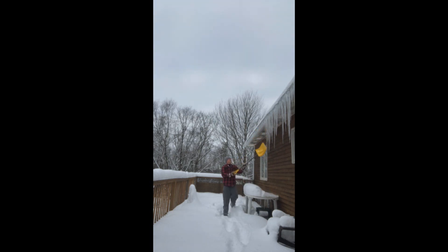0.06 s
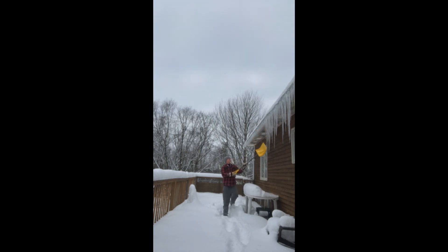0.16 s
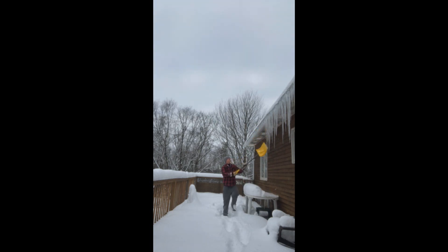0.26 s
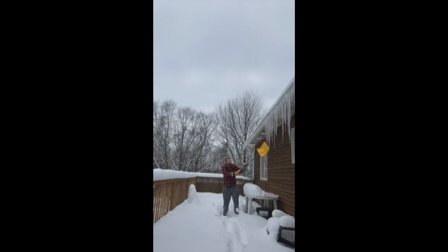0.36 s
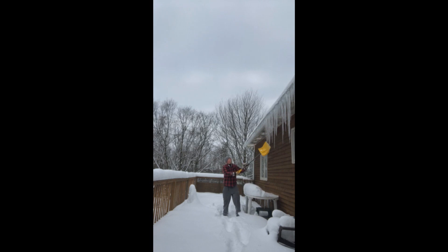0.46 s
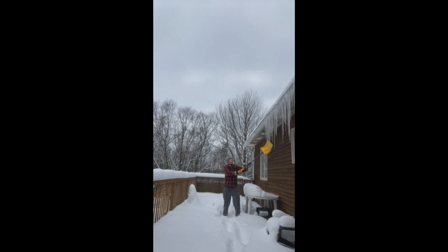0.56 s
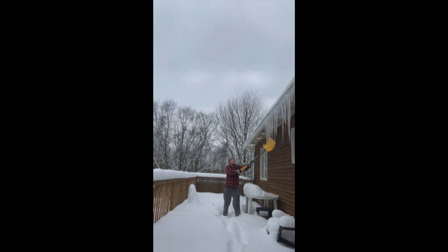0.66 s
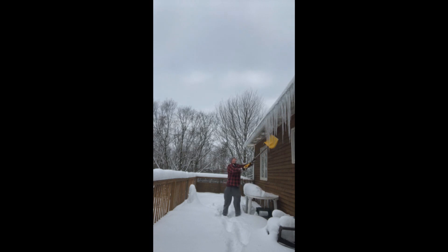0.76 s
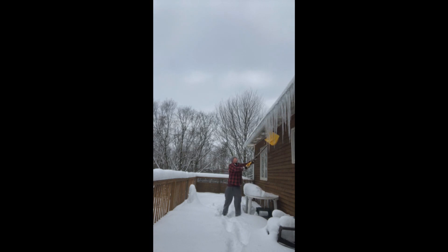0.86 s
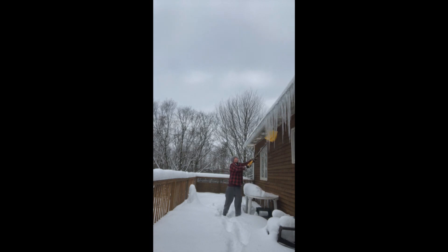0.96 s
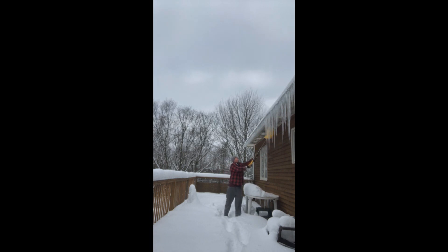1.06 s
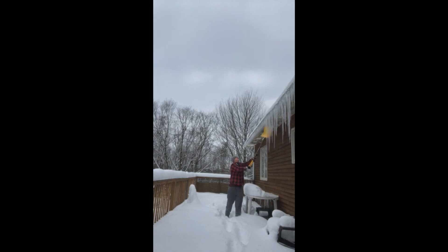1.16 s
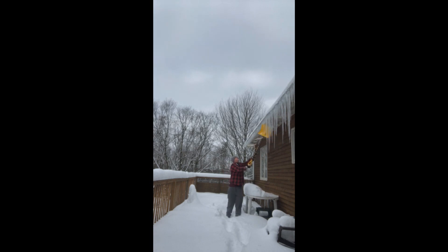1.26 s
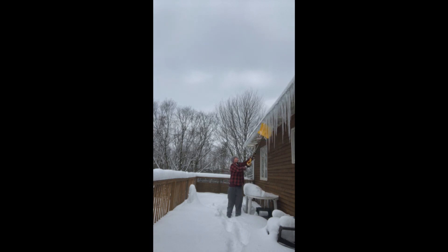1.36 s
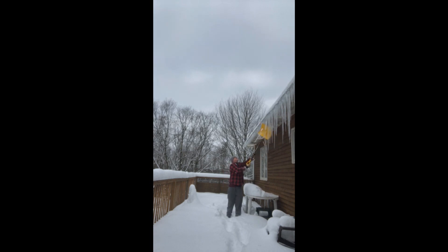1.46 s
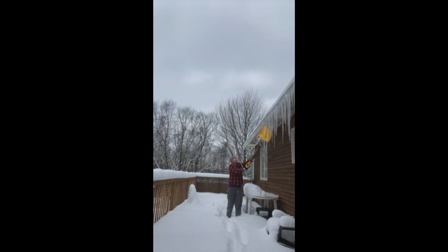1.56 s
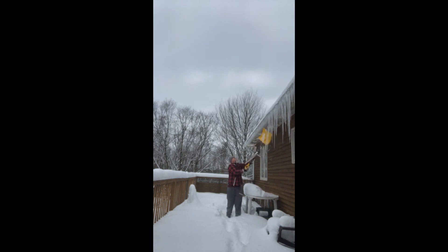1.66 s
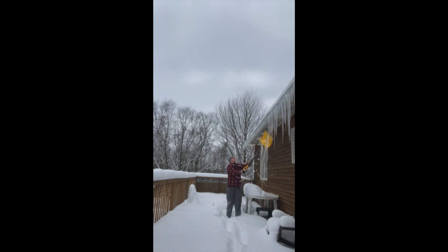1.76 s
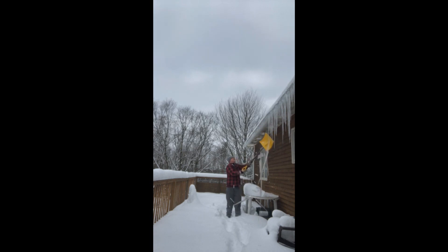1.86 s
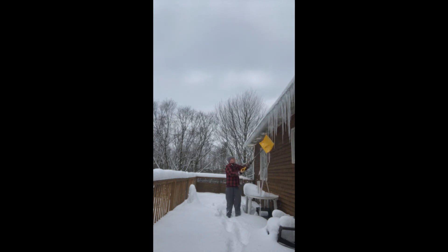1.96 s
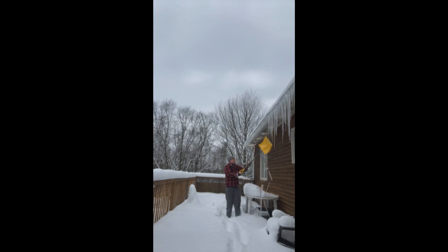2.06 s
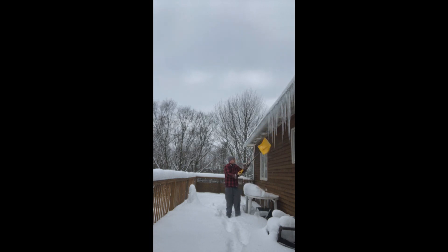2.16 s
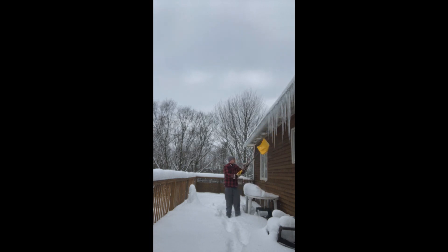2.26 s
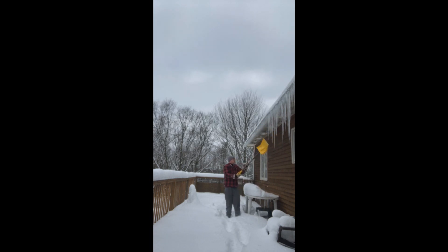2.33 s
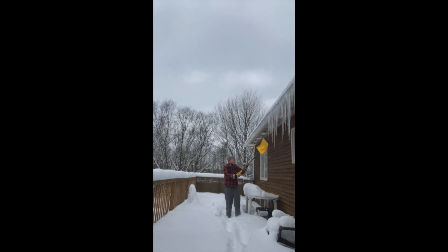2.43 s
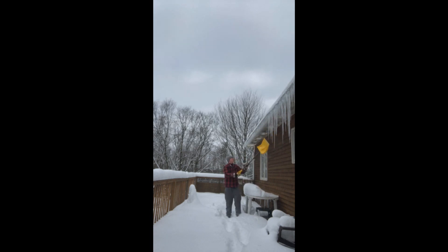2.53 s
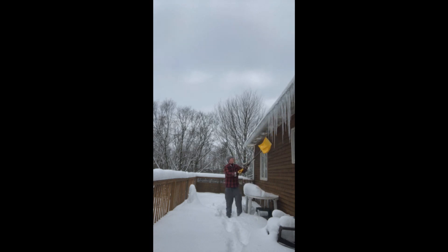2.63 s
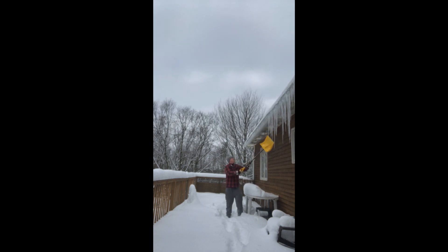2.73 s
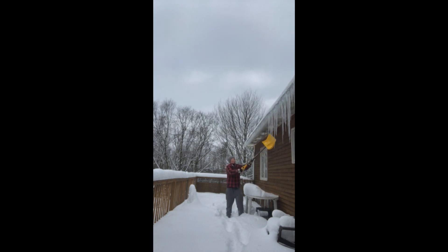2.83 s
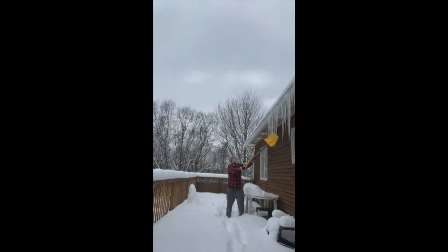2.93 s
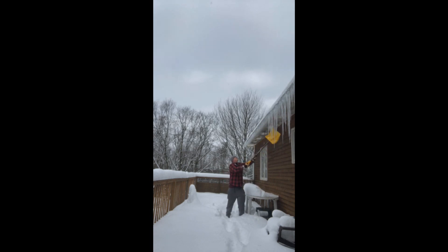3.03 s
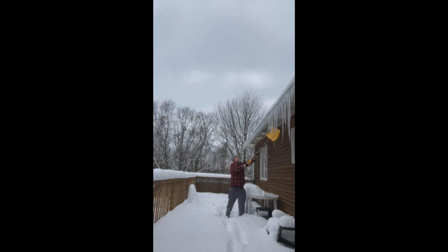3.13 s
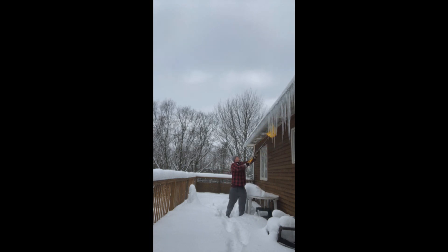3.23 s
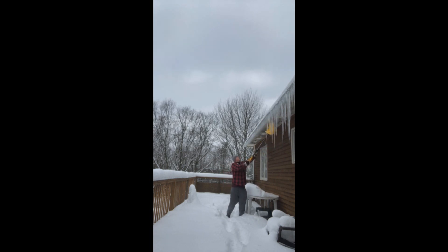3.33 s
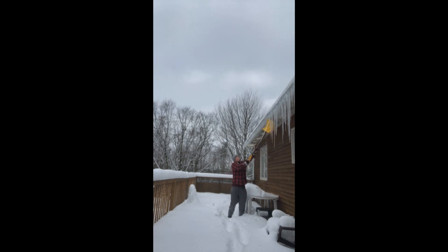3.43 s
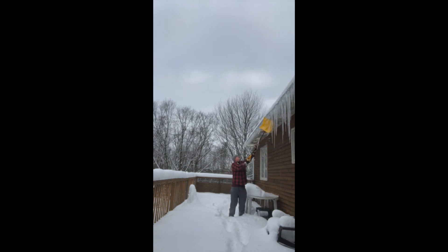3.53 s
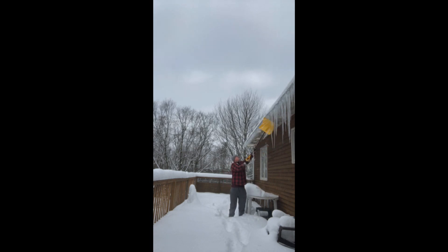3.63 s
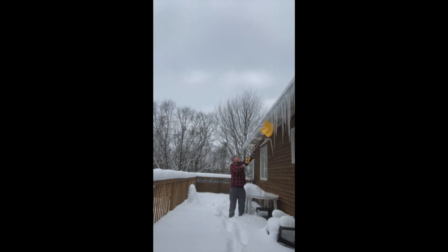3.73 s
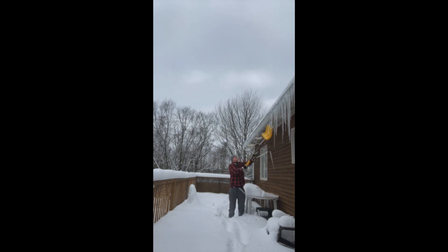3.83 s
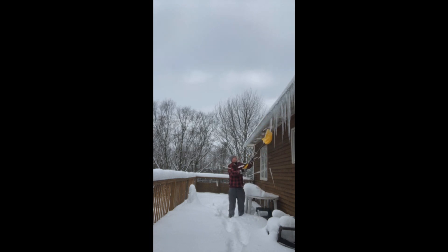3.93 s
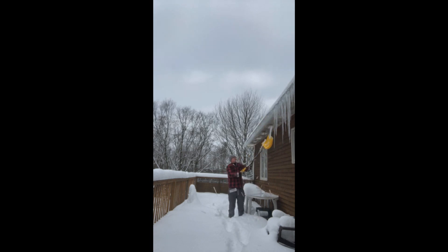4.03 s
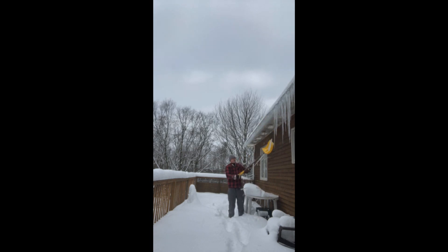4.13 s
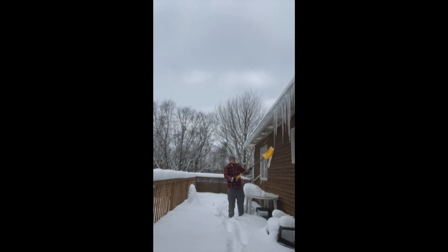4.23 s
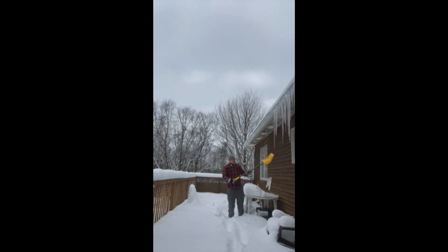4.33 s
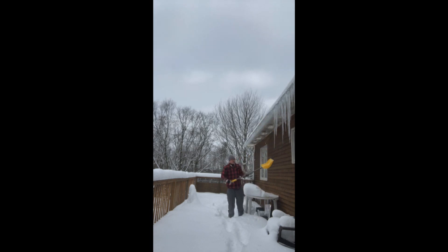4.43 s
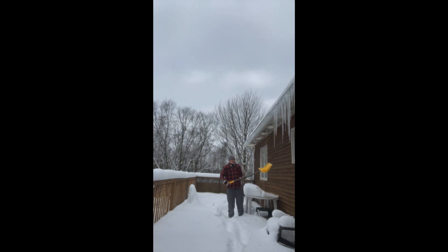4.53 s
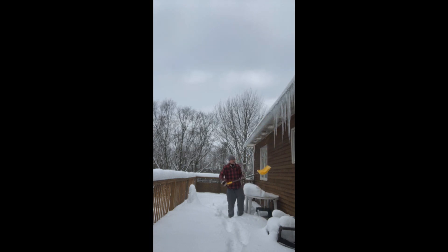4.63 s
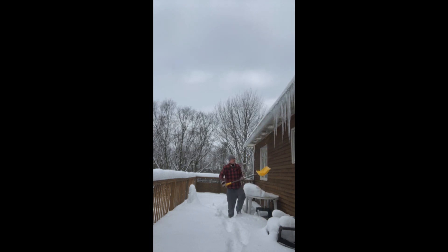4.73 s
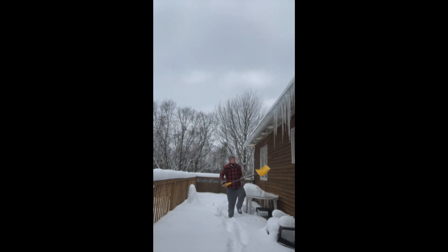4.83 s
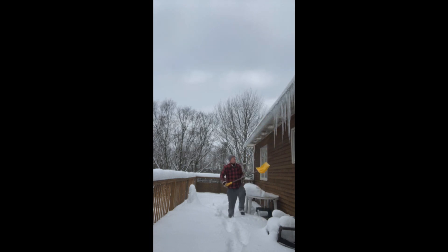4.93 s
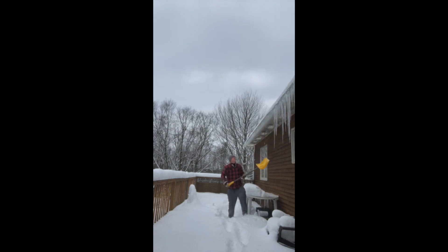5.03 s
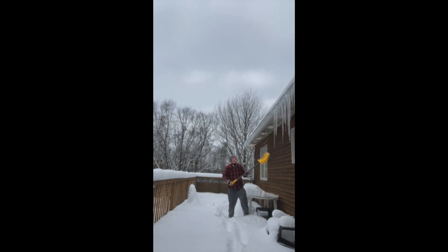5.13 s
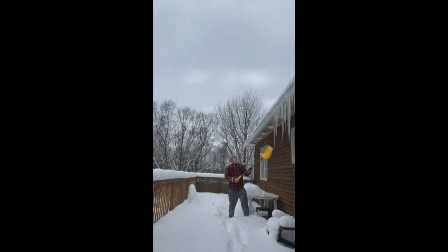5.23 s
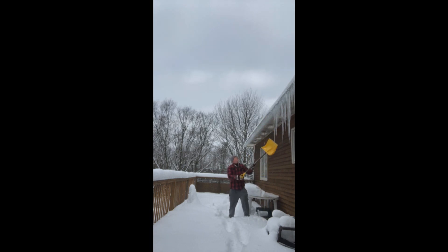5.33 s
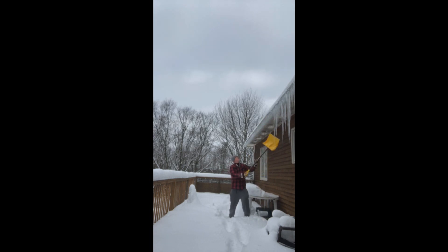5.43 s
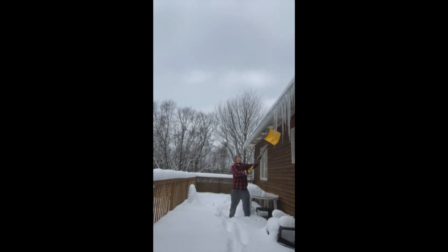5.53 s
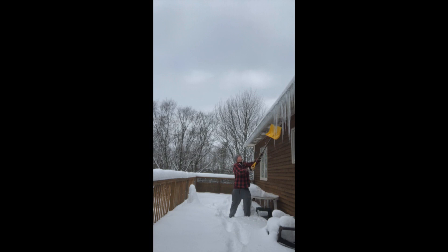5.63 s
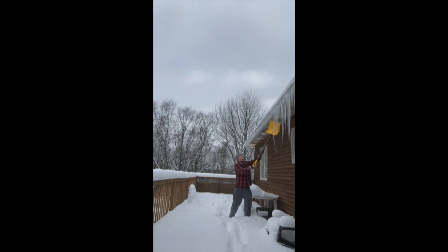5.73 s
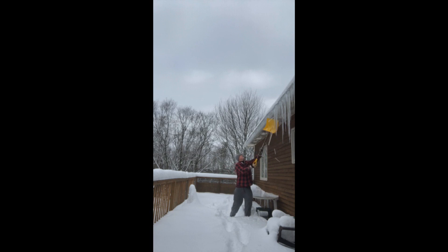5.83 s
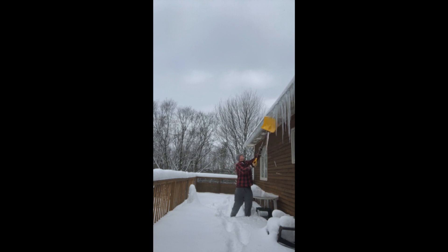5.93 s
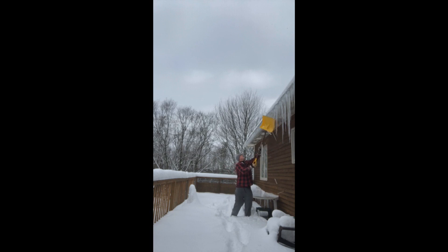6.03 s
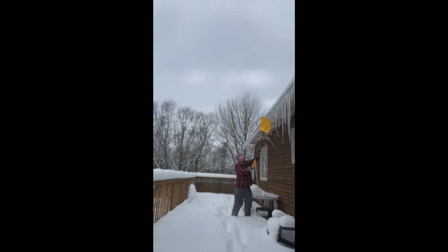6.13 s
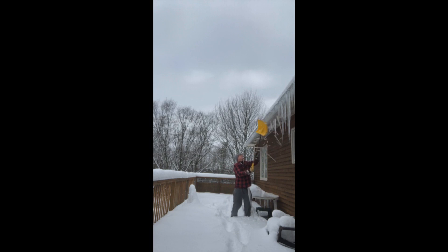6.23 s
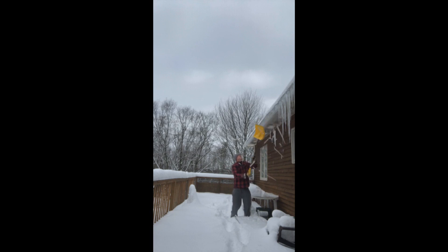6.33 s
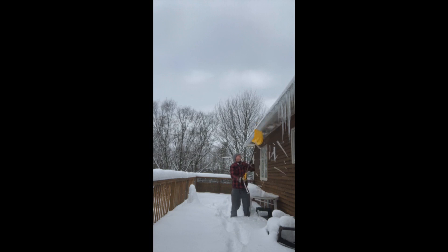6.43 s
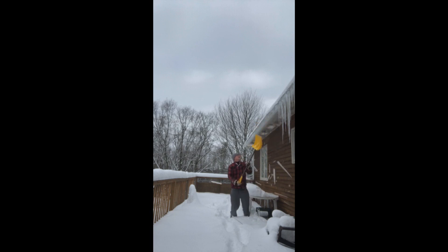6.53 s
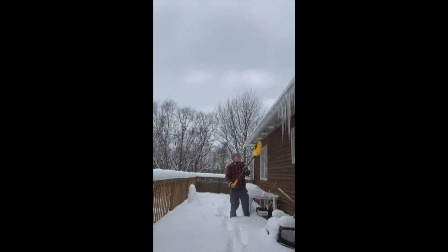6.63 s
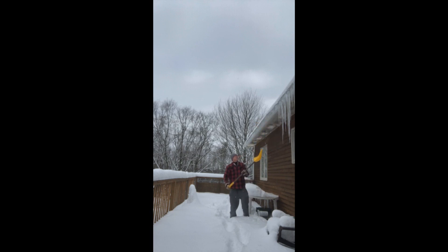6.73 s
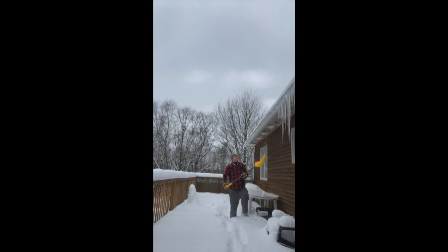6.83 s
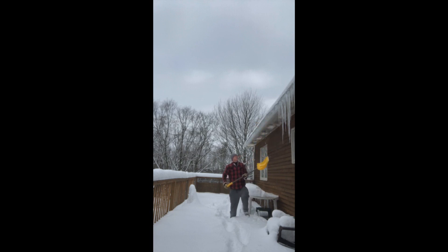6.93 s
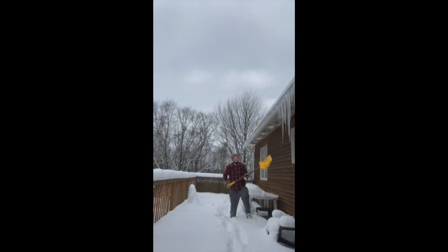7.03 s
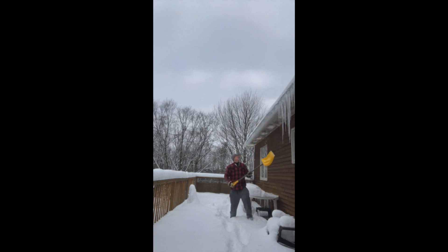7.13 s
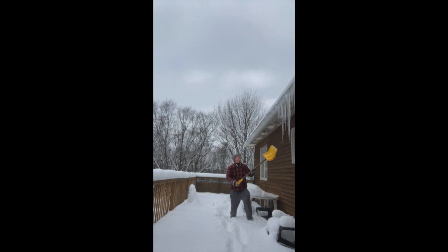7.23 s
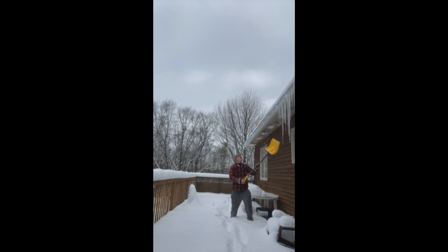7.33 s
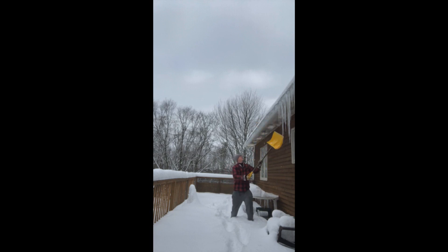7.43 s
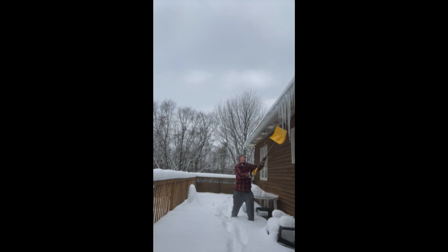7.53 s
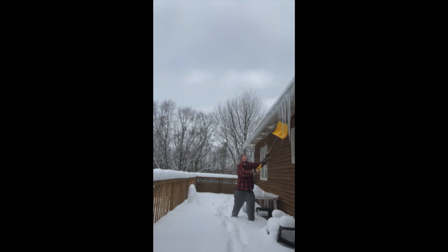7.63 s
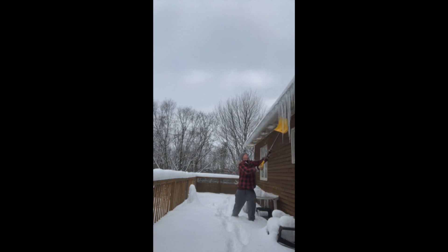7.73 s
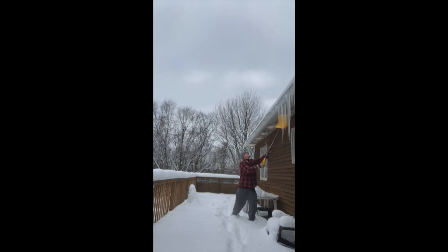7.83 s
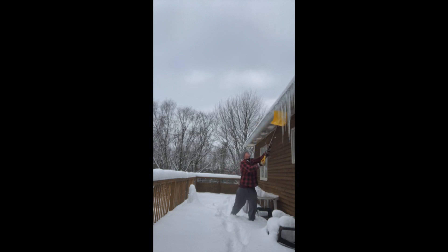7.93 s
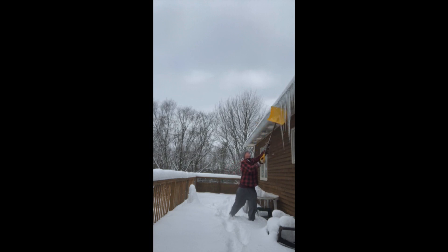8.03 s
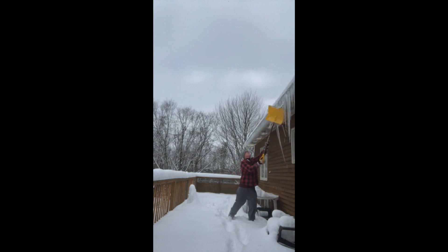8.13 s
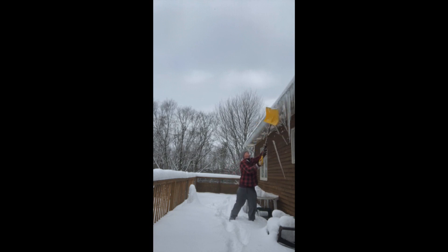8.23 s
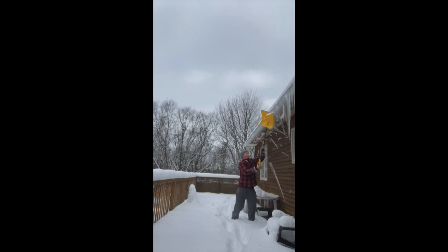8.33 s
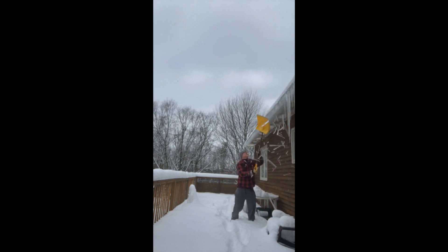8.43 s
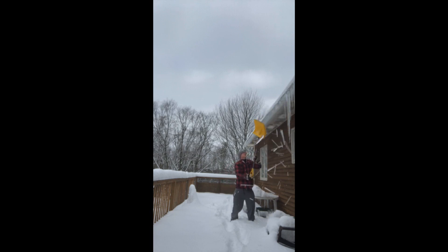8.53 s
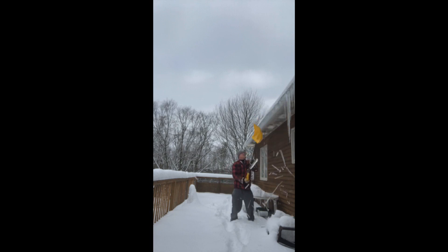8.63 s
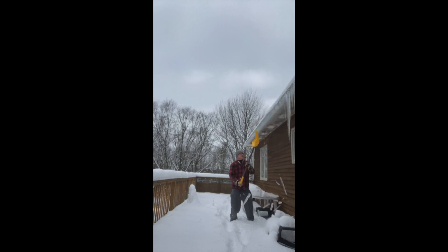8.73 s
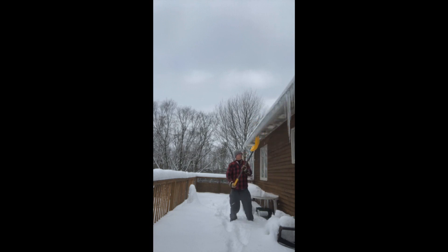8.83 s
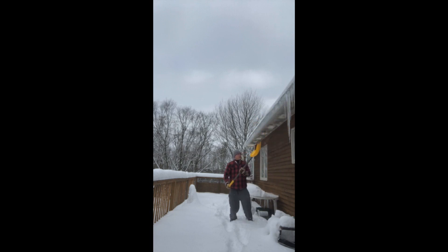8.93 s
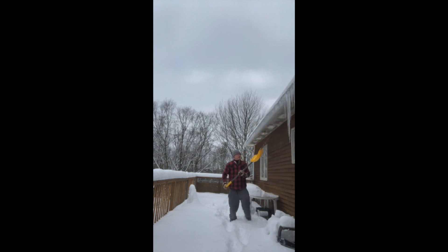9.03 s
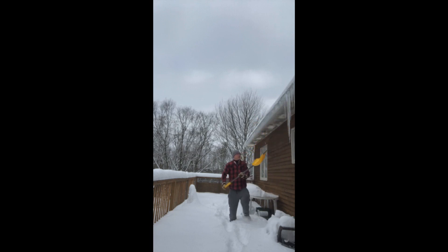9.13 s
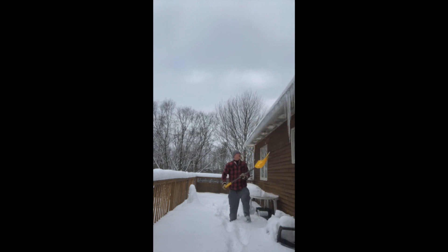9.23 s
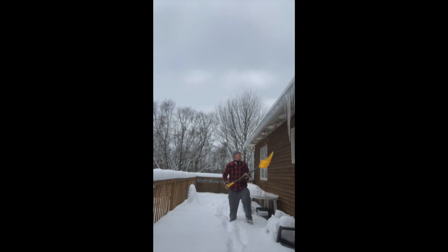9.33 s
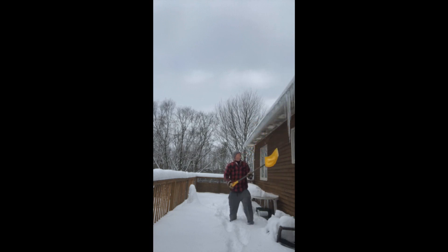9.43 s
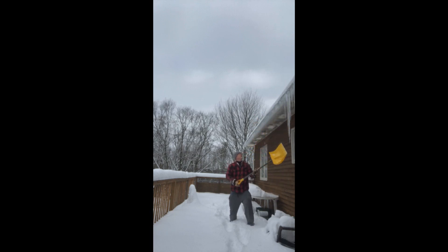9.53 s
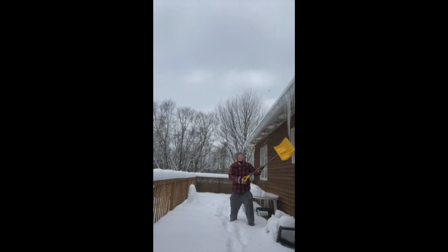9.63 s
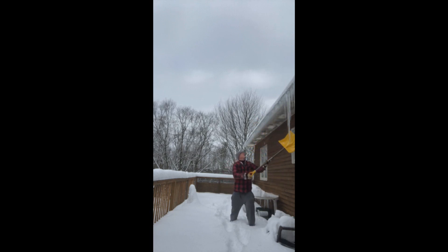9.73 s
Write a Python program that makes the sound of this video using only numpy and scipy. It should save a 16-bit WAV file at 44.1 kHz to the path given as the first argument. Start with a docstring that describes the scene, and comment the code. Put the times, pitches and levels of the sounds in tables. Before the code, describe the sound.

Icicles snap and shatter in repeated bursts as a rattling plastic shovel hits them, the pieces clacking and thudding down outdoors.

```python
"""A plastic shovel drags along a snowy roof edge and breaks off rows of icicles.
The blade knocks and rattles, and the gutter rings as it scrapes past. The ice cracks, thin shards ring,
thick pieces clack on the deck and heavy ones thud into the snow. Light wind, a far hum and a faint
whistle lie underneath; the house wall, deck and railing throw a little sound back."""
import sys
import numpy as np
from scipy import signal
from scipy.io import wavfile
from scipy.ndimage import uniform_filter1d

SR = 44100
rng = np.random.default_rng(int(sys.argv[2]) if len(sys.argv) > 2 else 0)


def generate_wav(sig):
    """Save sig (samples, or channels by samples) to the path in sys.argv[1] as 16-bit PCM at SR."""
    pcm = np.round(np.clip(np.atleast_2d(sig).T, -1, 1) * 32767).astype(np.int16)
    wavfile.write(sys.argv[1], SR, pcm)


N = 430857


def from_db(db):
    """Turn decibels into a number to multiply by."""
    return 10 ** (np.asarray(db) / 20)


def fade(clicks, fade_s):
    """Make every click die away by 60 dB in fade_s seconds."""
    return signal.lfilter([1], [1, -from_db(-60 / (fade_s * SR))], clicks + 1e-12)


def resonate(x, modes, strengths=None):
    """Ring an object's modes (its natural pitches); without strengths, white noise keeps its level."""
    out, power = 0, 0
    for k, (hz, width, level_db) in enumerate(modes):
        r = np.exp(-np.pi * width / SR)
        b = (1 - r * r) / 2 * np.array([1, 0, -1])
        a = [1, -2 * r * np.cos(2 * np.pi * hz / SR), r * r]
        drive = x if strengths is None else x * strengths[k]
        out += (-1) ** k * from_db(level_db) * signal.lfilter(b, a, drive + 1e-18)
        power += from_db(level_db) ** 2 * (1 - r * r) / 2
    return out / np.sqrt(power)


def shaped_noise(loudness, spectrum):
    """Noise that follows a loudness curve; the spectrum sets the balance of low and high."""
    hz, level_db = np.transpose(spectrum)
    edges = hz[0] * 2 ** np.arange(0, np.log2(hz[-1] / hz[0]) + .5, .5)  # half-octave bands
    edges = np.minimum(edges, .45 * SR)
    noise = loudness * rng.standard_normal((2, N))
    out, power = 0, 0
    for k, (low, high) in enumerate(zip(edges, edges[1:])):
        gain = from_db(np.interp(np.log(low * high) / 2, np.log(hz), level_db))
        band = signal.butter(2, [low, high], "band", fs=SR, output="sos")
        out += gain * signal.sosfilt(band, noise[k % 2])
        power += gain ** 2 * (high - low) * 2 / SR
    return out / np.sqrt(power)


def flutter(per_s, spread_db, fade_s):
    """Loudness curve of random bumps of uneven size, with an average power of 1."""
    sizes = from_db(spread_db * np.minimum(rng.exponential(1, N), 4))
    bumps = fade(sizes * (rng.random(N) < per_s / SR), fade_s)
    return bumps / np.sqrt(np.mean(bumps ** 2) + 1e-20)


def hits(rows, fade_s, rise_s, tail_s, tail_db):
    """Loudness curve of single hits: a short rise, a quick fade and a weaker, slow tail."""
    start_s, level_db = np.transpose(rows)[:2]
    clicks, tail = np.zeros(N), from_db(tail_db)
    clicks[(start_s * SR).astype(int)] = from_db(level_db)
    return fade(clicks, fade_s) + tail * fade(clicks, tail_s) - (1 + tail) * fade(clicks, rise_s)


def stretches(start_s, length_s, level_db, swell_db, fade_s, tail_s, tail_db, rise_s=0.0013):
    """Loudness curve of longer sounds: each rises, swells or sinks while held, then fades."""
    power = np.zeros(N)
    for start, held, db, swell in np.broadcast(start_s, length_s, level_db, swell_db):
        span = np.arange(int(start * SR), min(N, int((start + held + tail_s) * SR)))
        t = span / SR - start
        hold = from_db(db + swell * np.minimum(t / held, 1)) * (1 - np.exp(-t / rise_s))
        after = np.maximum(t - held, 0)
        release = from_db(-60 * after / fade_s) + from_db(tail_db - 60 * after / tail_s)
        power[span] += (hold * release / (1 + from_db(tail_db))) ** 2
    return np.sqrt(power)


def shovel(blade):
    """Knocks and rattling shake the plastic blade; its low boom builds more slowly than its upper ring."""
    # knocks and landings: start_s, level_db, pitch_hz
    knocks = [(0.124, -29, 786), (1.183, -18.5, 1390), (1.283, -21.5, 706), (1.405, -11, 1070),
              (1.424, -8.5, 990), (1.506, -13.5, 1360), (1.962, -11, 1470), (1.989, -12.5, 755),
              (2.394, -24, 664), (2.559, -23, 780), (2.61, -21.5, 890), (2.655, -16.5, 830),
              (3.382, -21, 1040), (3.495, -21, 714), (3.569, -18.5, 735), (3.596, -11.5, 1100),
              (3.628, -12, 704), (3.828, -17, 800), (4.102, -28, 1400), (4.215, -19.5, 750),
              (4.33, -15.5, 720), (4.393, -20, 910), (4.614, -18.5, 780), (5.102, -36, 790),
              (5.722, -19.5, 930), (5.81, -23.5, 1170), (5.866, -20, 724), (5.962, -15, 743),
              (6.082, -12.5, 1510), (6.23, -13.5, 1100), (6.355, -18.5, 1960), (6.788, -20, 1070),
              (6.838, -16.5, 890), (6.903, -20, 700), (7.049, -7.5, 980), (7.183, -21, 736),
              (7.575, -29.5, 719), (7.781, -27.5, 806), (7.952, -24, 895), (8.041, -17, 1930),
              (8.16, -10, 700), (8.586, -15.5, 840), (8.611, -18.5, 1000), (8.769, -16, 1730),
              (8.908, -8.5, 1660), (9.035, -12.5, 734), (9.123, -16.5, 1010), (9.209, -21.5, 990)]
    # the blade's low and upper modes: pitch_hz, width_hz, level_db
    low_modes = [(154, 93, -7), (230, 33, 5), (317.5, 39, 8.5), (378, 42.4, 9.5), (469, 114, 8.5),
                 (538, 176, 12), (624, 268, 8.5)]
    upper_modes = [(780, 67, -1.5), (927, 84, 0), (1138, 218, 3), (1272, 540, 2), (1578, 417, 1.5),
                   (1783, 312, -1), (2123, 700, -8), (2477, 203, -9.5)]
    rattle = blade * flutter(600, spread_db=2.5, fade_s=0.019)
    noise = rng.standard_normal((3, N))
    start_s, level_db, pitch_hz = np.transpose(knocks)
    boom_db = level_db - 1 - 10 * np.log2(pitch_hz / np.median(pitch_hz))  # low knocks boom more
    thump = hits(np.transpose([start_s, boom_db]), fade_s=0.053, rise_s=0.0029, tail_s=0.22, tail_db=-11)
    boom = resonate((thump + from_db(1) * rattle) * noise[0], low_modes)
    tap = hits(knocks, fade_s=0.055, rise_s=0.00023, tail_s=0.26, tail_db=-13)
    # each knock lands on another spot, so the modes near its pitch ring louder
    octaves_away = np.log2(np.array(upper_modes)[:, 0] / pitch_hz[:, None])
    spot_db = 5.5 * (np.exp(-(octaves_away / 0.34) ** 2) - .5)
    spot_db += 2 * rng.standard_normal(spot_db.shape)
    latest_knock = np.maximum(np.searchsorted(start_s, np.arange(N) / SR) - 1, 0)
    upper = resonate(tap * noise[1], upper_modes, from_db(spot_db)[latest_knock].T)
    upper += resonate(rattle * noise[2], upper_modes)
    return boom + signal.sosfilt(signal.butter(2, 4000, fs=SR, output="sos"), upper)


def breaking_ice(splinters, pieces):
    """Ice cracks and splinters, and falling pieces patter; all of it throws off tinkling bits."""
    # cracks: start_s, level_db
    cracks = [(1.18, -27.5), (1.2366, -31.5), (1.281, -34), (1.3493, -34), (1.4067, -30), (1.4254, -23),
              (1.5017, -22.5), (1.5444, -28.5), (1.5993, -34), (1.6881, -36.5), (1.7345, -41), (1.96, -23),
              (1.9889, -26.5), (2.0346, -26), (2.2293, -24), (2.393, -28.5), (3.3802, -36), (3.496, -41),
              (3.5687, -27), (3.5903, -22.5), (3.7404, -31.5), (4.105, -38.5), (4.192, -37), (4.245, -38),
              (4.3302, -28.5), (4.4826, -37.5), (4.5487, -35), (5.1029, -48.5), (5.7262, -30.5),
              (5.9224, -38), (5.9504, -26), (6.1105, -22), (6.1404, -28), (6.1713, -29), (6.2267, -23),
              (6.353, -33.5), (6.4585, -33), (6.7878, -31), (6.8347, -29.5), (6.8997, -30), (7.0472, -42),
              (7.0958, -35), (7.9612, -31.5), (8.0205, -31.5), (8.2367, -38), (8.3604, -29.5),
              (8.469, -29.5), (8.5077, -30.5), (8.5756, -19), (8.7207, -30), (8.908, -20.5), (9.209, -35)]
    # the bright tone of a crack: pitch_hz, level_db
    spectrum = [(1530, 3.5), (2600, 2), (4920, -1.5), (6520, 0), (11500, -7), (16000, -11)]
    crunch = splinters * flutter(1900, spread_db=6, fade_s=0.0095)
    patter = pieces * flutter(250, spread_db=3, fade_s=0.029)
    breaking = crunch + hits(cracks, fade_s=0.055, rise_s=0.0028, tail_s=0.1, tail_db=-17)
    return shaped_noise(breaking + patter, spectrum) + tinkle(breaking + from_db(3.5) * patter)


def tinkle(loudness, per_s=300, fade_s=0.046):
    """Countless tiny bits of ice ring briefly at scattered pitches, the high ones weaker."""
    sizes = loudness * from_db(2.5 * np.minimum(rng.exponential(1, N), 2))
    clicks = sizes * (rng.random(N) < per_s / SR)
    pitch_choice = rng.integers(0, 40, N)
    out, decay = 0, from_db(-60 / (fade_s * SR))
    for k, hz in enumerate(np.geomspace(3200, 14000, 40)):
        angle = 2 * np.pi * hz / SR
        b, a = [0, np.sin(angle)], [1, -2 * decay * np.cos(angle), decay ** 2]
        out += from_db(-3.5 - 0.14 * k) * signal.lfilter(b, a, clicks * (pitch_choice == k) + 1e-18)
    return out


def still_air():
    """The soft, steady hiss of the outdoors."""
    # its tone: pitch_hz, level_db
    spectrum = [(88, -60), (150, -55), (226, -24), (821, -11.5), (2550, -29.5), (7920, -34), (16000, -52.5)]
    return shaped_noise(from_db(-58), spectrum)


def wind_and_thuds():
    """Light wind rumbles, and heavy pieces land in the snow with the same dull tone."""
    # that tone: pitch_hz, level_db
    spectrum = [(25, -25), (43, -8.5), (76, -2), (144, -1), (240, -5.5), (420, -12)]
    # landings in the snow: start_s, level_db
    landings = [(.02, -31.5), (.69, -37.5), (.777, -43), (.921, -45), (2.1, -30), (2.22, -26), (4.62, -39),
                (6.457, -28), (6.88, -21), (8.6, -26), (8.92, -21.5)]
    wind = from_db(-46.5) * flutter(94, spread_db=-14, fade_s=0.27)
    thuds = hits(landings, fade_s=0.11, rise_s=0.01, tail_s=0.62, tail_db=-13.5)
    return shaped_noise(wind + thuds, spectrum)


def yard_echoes(sound):
    """Two dull echoes come back; snow swallows the rest."""
    # echoes from wall, deck and railing: delay_s, level_db
    echoes = [(.017, -12.5), (.033, -15.5)]
    back = sum(from_db(db) * np.pad(sound, (int(delay_s * SR), 0))[:N] for delay_s, db in echoes)
    return signal.lfilter([.5], [1, -.5], back)


def shards(bounce_s=.016, bounce_loss_db=10):
    """A thin shard rings at its main pitch and four weaker ones, then bounces twice."""
    # shards landing: start_s, level_db, pitch_hz
    landings = [(0.0622, -31, 7020), (1.821, -27.5, 1440), (6.25, -29, 2650), (6.634, -27.5, 5220),
                (6.637, -52, 3270), (6.705, -33.5, 6580), (7.095, -27, 8440), (7.097, -28.5, 5800),
                (7.2417, -36.5, 3690), (7.376, -47, 3750), (8.3614, -33, 4820), (8.438, -32.5, 3120),
                (8.4707, -26.5, 2540), (8.484, -27.5, 4700), (8.64, -27, 3060), (8.685, -29.5, 4000),
                (9.1045, -26, 5540), (9.169, -29.5, 5630), (9.2583, -36, 6850), (9.3546, -27.5, 5410),
                (9.439, -37, 5590), (9.523, -37, 7560)]
    out, t = np.zeros(N + SR), np.arange(SR // 4) / SR
    loudness = from_db(-60 * t / 0.043) * (1 - np.exp(-t / 0.00011))
    for start_s, level_db, pitch_hz in landings:
        ratios = [1.07, .96, .61, 1.43] * rng.uniform(.99, 1.01, 4)  # the two near 1 make it waver
        phase = 2 * np.pi * pitch_hz * t
        for bounce in range(3):
            side_tones = sum(rng.random() * np.sin(ratio * phase) for ratio in ratios)
            ring = np.sin(phase) + from_db(-3) * side_tones
            i = int((start_s + bounce_s * bounce * rng.uniform(.5, 1.5)) * SR)
            out[i:i + len(t)] += from_db(level_db - bounce_loss_db * bounce) * loudness * ring
    return out[:N]


def clacks(contact_s=0.031):
    """A short, rough contact with the boards sets a thick piece of ice ringing."""
    # thick pieces landing: start_s, level_db, pitch_hz
    landings = [(0.219, -21, 1090), (3.684, -10.5, 644), (4.196, -15, 1530), (4.3981, -19.5, 1760),
                (4.6113, -20.5, 3360), (6.9346, -26, 1800), (6.9482, -18, 1810), (6.9643, -14, 1800),
                (6.9742, -14, 1880), (7.0257, -31, 1900), (7.048, -4.5, 2093), (7.1797, -21, 1830),
                (8.238, -8, 630), (8.3875, -16, 1510), (8.404, -14, 1570), (8.4767, -19.5, 1570),
                (9.001, -14, 1890)]
    # a piece's three modes: pitch_ratio, width_hz, level_db
    modes = [(.64, 120, -4), (0.998, 160, -0.5), (1.53, 202, -9.5)]
    out, t = np.zeros(N + SR), np.arange(SR // 10) / SR
    for start_s, level_db, pitch_hz in landings:
        contact = rng.standard_normal(len(t)) * from_db(-60 * t / contact_s)
        clack = resonate(contact, np.array(modes) * [pitch_hz, 1, 1])
        i = int(start_s * SR)
        out[i:i + len(t)] += from_db(level_db) * clack / np.abs(clack).max()
    return out[:N]


def gutter(shaking):
    """The gutter rings while the blade drags along it."""
    # its modes: pitch_hz, width_hz, level_db
    modes = [(319, 14, 0), (592, 24, -3)]
    return resonate(shaking * rng.standard_normal(N), modes)


def hollow_object(shaking):
    """Something hollow on the deck rings as ice drops on it."""
    # its modes: pitch_hz, width_hz, level_db
    modes = [(378, 20, 0), (1060, 30, -4)]
    # when ice drops on it: start_s, end_s, gain_db
    drops = [(1.32, 1.7, -8), (6.6, 7.3, -8), (7.35, 7.55, 7), (9.19, 9.45, 2)]
    t = np.arange(N) / SR
    gain = sum(from_db(db) * (t > start_s) * (t < end_s) for start_s, end_s, db in drops)
    return resonate(gain * shaking * rng.standard_normal(N), modes)


def far_tones():
    """A far hum and a faint whistle, each one pure tone that fades in and out."""
    # hum and whistle: start_s, end_s, level_db, pitch_hz
    tones = [(3.9, 5.9, -53, 234), (5.46, 5.64, -63, 1640)]
    out, t = 0, np.arange(N) / SR
    for start_s, end_s, level_db, pitch_hz in tones:
        loudness = uniform_filter1d(from_db(level_db) * (t > start_s) * (t < end_s), size=SR // 10)
        out += loudness * np.sin(2 * np.pi * pitch_hz * t)
    return out


def scene():
    """Shovel strokes and falling ice, with their echoes, over the quiet outdoors."""
    # the blade drags along the edge: start_s, length_s, blade_db, ice_db, gutter_vs_blade_db, swell_db
    strokes = [(1.307, 0.33, -23.5, -37, -11, 0), (3.582, 0.21, -22, -35, -5.5, -9.5),
               (3.843, 0.089, -16, -30.5, -4, -14), (5.902, 0.34, -20.5, -37.5, -8.5, -5),
               (8.042, 0.22, -20, -29.5, -9, 3.5)]
    # broken pieces clatter down: start_s, length_s, blade_db, ice_db
    falls = [(0, 0.034, -37.5, -47), (0.126, 0.18, -40.5, -87), (0.617, 0.082, -46, -62),
             (1.67, 0.078, -32.5, -80), (1.996, 0.22, -37.5, -43.5), (2.212, 0.066, -26.5, -31),
             (2.32, 0.11, -33, -46), (2.578, 0.15, -40, -57), (4.209, 0.077, -34.5, -39),
             (4.334, 0.26, -40.5, -59), (4.607, 0.033, -43, -43), (6.24, 0.23, -41.5, -50.5),
             (6.617, 0.16, -48.5, -51.5), (6.821, 0.16, -27.5, -38), (7.019, 0.25, -36, -53.5),
             (7.294, 0.92, -48.5, -67.5), (8.293, 0.17, -30.5, -42.5), (8.577, 0.55, -40, -43),
             (8.884, 0.12, -28, -35.5), (8.982, 0.3, -42.5, -48), (9.282, 0.29, -65, -55)]
    blade_fade = dict(fade_s=0.22, tail_s=5.7, tail_db=-22.5)
    ice_fade = dict(fade_s=0.077, tail_s=1, tail_db=-12.5)

    start_s, length_s, blade_db, ice_db, gutter_vs_blade_db, swell_db = np.transpose(strokes)
    scrape = stretches(start_s, length_s, blade_db, swell_db, **blade_fade)
    drag = stretches(start_s, length_s, blade_db + gutter_vs_blade_db, swell_db, **blade_fade)
    splinters = stretches(start_s, length_s, ice_db, swell_db, **ice_fade)

    start_s, length_s, blade_db, ice_db = np.transpose(falls)
    clatter = stretches(start_s, length_s, blade_db, swell_db=0, **blade_fade)
    pieces = stretches(start_s, length_s, ice_db, swell_db=0, **ice_fade)

    blade = np.hypot(scrape, clatter)  # their powers add
    near = shovel(blade) + breaking_ice(splinters, pieces) + shards() + clacks()
    shaking = flutter(150, spread_db=2.5, fade_s=0.094)  # many small contacts
    near += gutter(drag * shaking) + hollow_object(blade * shaking)
    return (near + yard_echoes(near) + still_air() + wind_and_thuds() + far_tones())[None]


def record(dry):
    """Cut the highest treble steeply: 70 dB down from 16400 Hz up."""
    return signal.sosfilt(signal.cheby2(14, 70, 16400, fs=SR, output="sos"), dry)


dry = scene()
out = record(dry)
generate_wav(out)
```